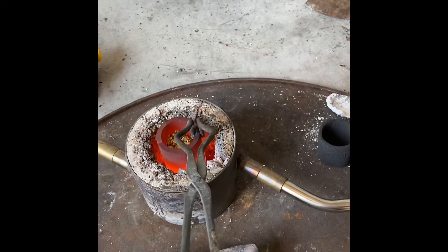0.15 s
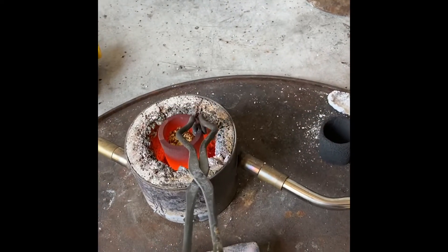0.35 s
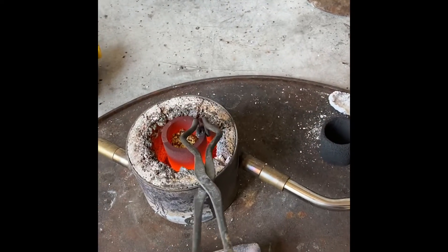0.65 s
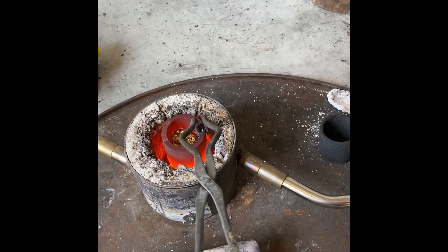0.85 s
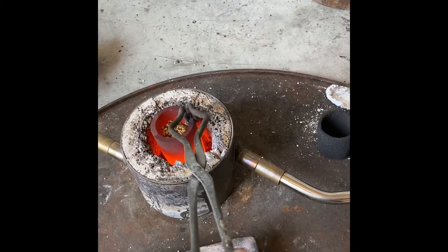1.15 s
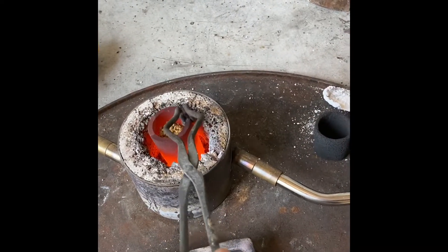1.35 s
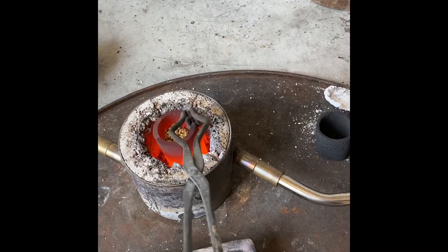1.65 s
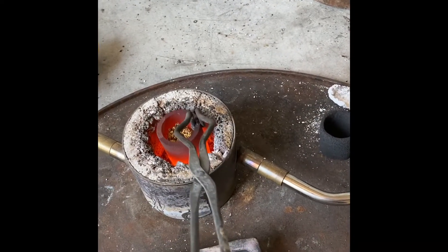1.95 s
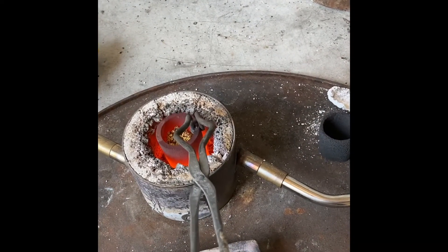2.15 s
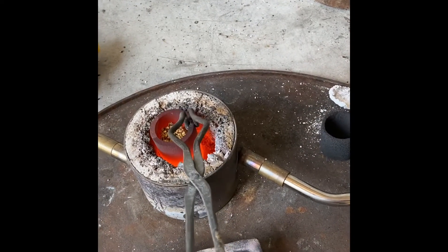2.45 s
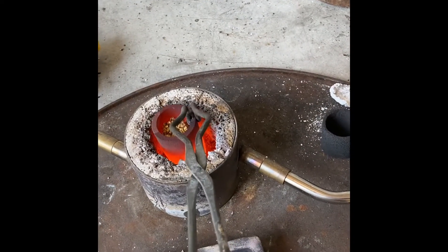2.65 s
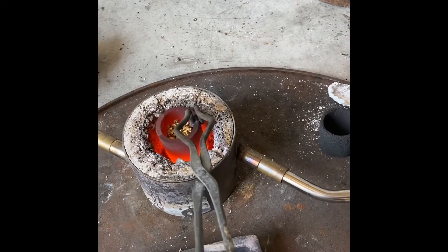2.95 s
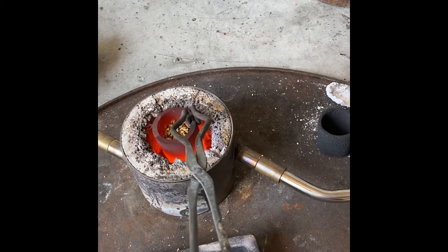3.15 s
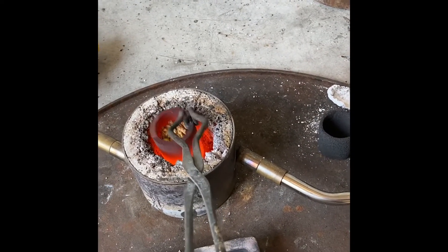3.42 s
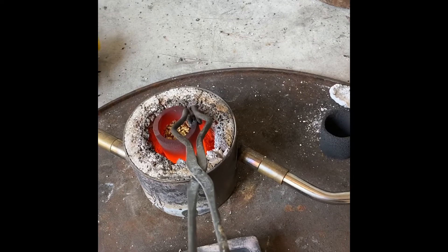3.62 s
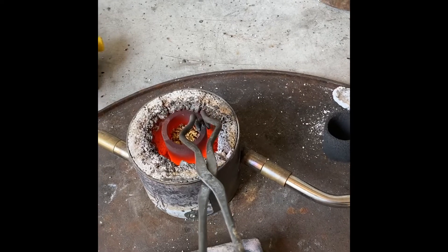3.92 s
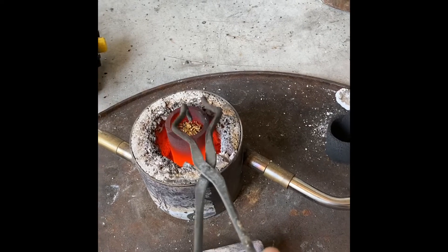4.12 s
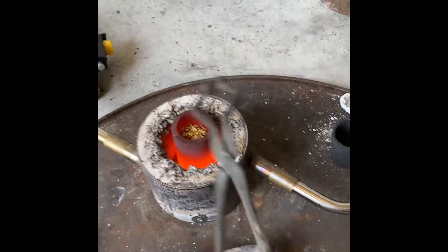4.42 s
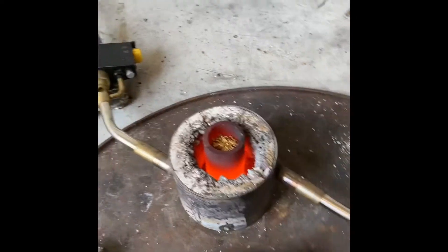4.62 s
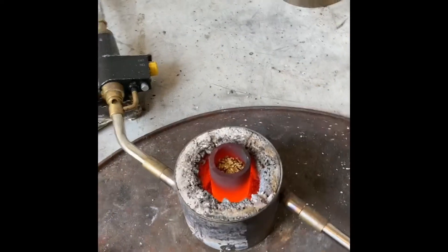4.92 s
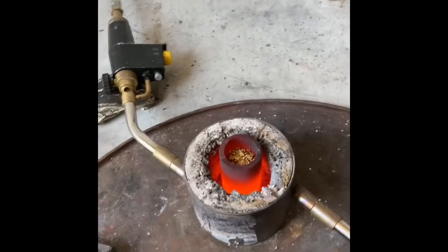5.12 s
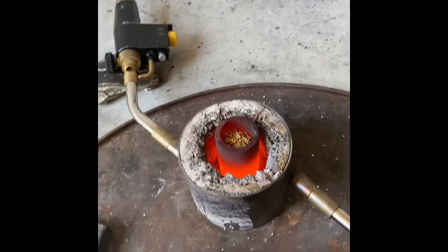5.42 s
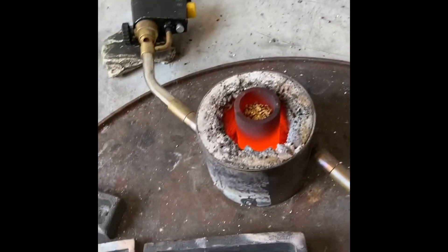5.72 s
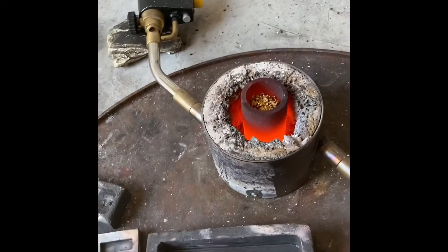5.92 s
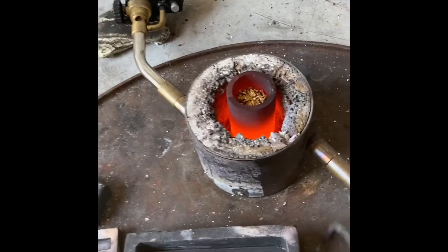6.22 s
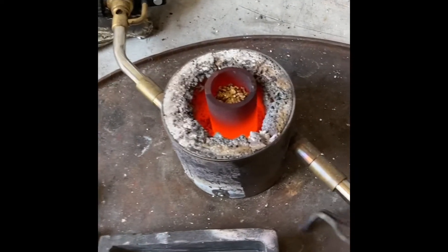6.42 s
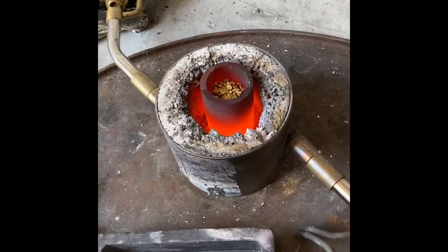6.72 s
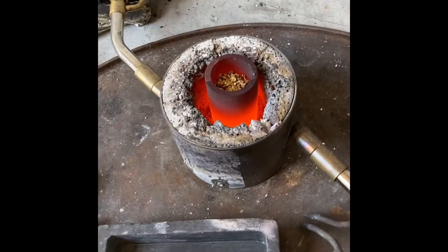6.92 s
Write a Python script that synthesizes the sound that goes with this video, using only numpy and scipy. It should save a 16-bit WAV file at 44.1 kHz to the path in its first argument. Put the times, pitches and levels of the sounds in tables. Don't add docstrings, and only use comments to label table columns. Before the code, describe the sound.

Quiet clay knocks and dry hinge ticks beside a low gas flame, distant engines passing, then tongs clank, bounce and settle on steel plate.

```python
import sys
import numpy as np
from scipy import signal
from scipy.fft import rfft, irfft, next_fast_len
from scipy.io import wavfile
from scipy.ndimage import uniform_filter1d

SR = 44100
rng = np.random.default_rng(int(sys.argv[2]) if len(sys.argv) > 2 else 0)


def to_wav(sig):
    pcm = np.clip(np.atleast_2d(sig), -1, 1) * 32767
    pcm = np.round(pcm).astype(np.int16)
    wavfile.write(sys.argv[1], SR, pcm.T)


def nominal_scale(level):
    x = np.asarray(level, float) / 20
    return 10 ** x


N = 311787

# start_s, level_db
DRAGS = [
    [(0.565, -54), (0.64, -54), (0.74, -62.5), (0.8, -69), (0.9, -68)],
    [(5.383, -47), (5.403, -35), (5.441, -54.5), (5.58, -45.5), (5.685, -45.5), (5.78, -58), (5.885, -60.5)],
    [(6.06, -61), (6.095, -41), (6.17, -48), (6.24, -63), (6.36, -55.5), (6.47, -48), (6.561, -32),
     (6.76, -52), (7.07, -63.5)],
]
# pitch_hz, width_hz, level_db
BENDING_MODES = [(114, 17.2, 4), (212, 76, -2.5), (303.7, 15.7, 0.5), (400, 67, -3.5)]


def rms_one(x):
    return x / np.sqrt(np.mean(x ** 2) + 1e-20)


def in_time(rows):
    s, *columns = np.transpose(rows)
    t = np.arange(N) / SR
    gate = np.clip(np.minimum(t - s[0], s[-1] + .03 - t) / .012, 0, 1)
    return [np.interp(t, s, c) for c in columns] + [gate]


def at_hz(points, hz):
    return np.interp(np.log(hz), np.log(np.array(points)[:, 0]), np.array(points)[:, 1])


def band(x, low_hz, high_hz):
    edges = [low_hz, min(high_hz, .45 * SR)]
    return signal.sosfilt(signal.butter(2, edges, "band", fs=SR, output="sos"), x)


def drift(rate_hz):
    r = np.exp(-80 * np.pi * rate_hz / SR)
    slow = signal.lfilter([1], [1, -2 * r, r * r], rng.standard_normal(N // 40 + 2002))[2000:]
    return np.interp(np.arange(N) / 40, np.arange(len(slow)), rms_one(slow))


def resonate(x, hz, width_hz):
    r = np.exp(-np.pi * width_hz / SR)
    gain = (1 - r * r) / 2
    return signal.lfilter([gain, 0, -gain], [1, -2 * r * np.cos(2 * np.pi * hz / SR), r * r], x + 1e-18)


def grit(per_s, uneven_db):
    sizes = nominal_scale(uneven_db * np.minimum(rng.exponential(1, N), 4)) * rng.choice([-1, 1], N)
    return rms_one(sizes * (rng.random(N) < per_s / SR))


def first_contact(grains, s, size):
    out = grains.copy()
    out[np.round(s * SR).astype(int)] = size
    return out


def strokes(s, db, t60, rise):
    out, t = np.zeros(N + SR), np.arange(-(SR // 40), SR // 3) / SR
    for s0, level, decay, up in zip(s, nominal_scale(db), np.maximum(t60, .004), np.maximum(rise, 5e-5)):
        swell_db = 20 * t / up - 30 * (40 * t) ** 4
        decay_db = -60 * np.abs(t / decay) ** 1.114
        out[round(s0 * SR) - SR // 40:][:len(t)] += level * nominal_scale(np.where(t < 0, swell_db, decay_db))
    return out[:N]


def body(force, s, modes, grains, spread_db, broad_db, low_hz, high_hz):
    touch = np.searchsorted(np.array(s) * SR, np.arange(N)) - 1
    spot = nominal_scale(min(spread_db, 5) * rng.uniform(-1, 1, (len(s), len(modes))))
    chosen = [(k, m) for k, m in enumerate(modes) if low_hz <= m[0] < high_hz]
    push = force * grains
    rings = sum((-1) ** k * nominal_scale(db) * resonate(push * spot[touch, k], hz, w) for k, (hz, w, db) in chosen)
    ring_rms = np.std(sum(nominal_scale(db) * resonate(grains[:SR], hz, w) for k, (hz, w, db) in chosen))
    crunch = band(push, low_hz, high_hz) / np.std(band(grains[:SR], low_hz, high_hz))
    return rings / ring_rms + nominal_scale(broad_db) * crunch


def grip_tones(force, s, grip_hz, cycles):
    out = np.zeros(N + SR)
    at = np.round(np.append(s, s[-1] + 0.03) * SR).astype(int) - 200
    for i, j, hz in zip(at, at[1:], grip_hz):
        push = np.zeros(SR // 4)
        push[:min(j - i, len(push))] = force[i:j][:len(push)]
        out[i:i + len(push)] += resonate(push, hz, hz / cycles) * np.sqrt(cycles * SR / hz)
    return out[:N]


def ports(x, pan_db=0):
    turns = np.minimum(np.arange(N // 2 + 1) * SR / N * .00011, 1.2)
    late = irfft(rfft(x) * np.exp(-2j * np.pi * turns), N)
    return np.array([late * nominal_scale(pan_db / 2), x * nominal_scale(-pan_db / 2)])


def plate():
    # start_s, knock_db, clink_db, boom_db, ring_hz
    set_down = [(5.399, -42, -19.5, -52, 2780), (5.406, -37, -10, -21.5, 6150),
                (5.408, -11, -34, -28, 1590), (5.452, -20.5, -29, -39, 1720), (5.456, -50, -32, -54, 3870),
                (5.496, -46, -41, -28, 1850), (5.584, -62, -34, -28, 9100),
                (5.604, -19.5, -28.5, -19.5, 1050), (5.638, -22, -27.5, -20.5, 850),
                (5.645, -62, -35, -60, 8200), (5.677, -23.5, -37, -27, 2000),
                (5.737, -26, -28.5, -27, 1870), (5.784, -24.5, -48, -37, 1665),
                (5.813, -26.5, -35.5, -31.5, 3470), (5.857, -32, -41.5, -42, 8650),
                (5.953, -41, -52, -48, 1500), (6.074, -28.5, -39, -31, 1440),
                (6.101, -36.5, -42.5, -51, 1430), (6.147, -35, -42, -42, 7200),
                (6.214, -40, -56, -28, 1130), (6.357, -42, -49.5, -55, 935)]
    # start_s, knock_db, clink_db, boom_db, ring_hz
    let_go = [(6.495, -50, -26, -50, 6280), (6.502, -30, -11, -18, 6420), (6.51, -15, -60, -39, 630),
              (6.525, -10.5, -14.5, -21.5, 928), (6.528, -50, -26, -50, 8300),
              (6.553, -13, -8, -24.5, 9300), (6.556, -19, -46, -42, 1820), (6.584, -18.5, -9, -19.5, 3870),
              (6.609, -31.5, -24.5, -48.5, 930), (6.651, -15.5, -15, -45, 7200),
              (6.657, -43, -43, -48, 665), (6.664, -29.5, -47, -46.5, 1850), (6.718, -30.5, -22, -33, 7000),
              (6.737, -37, -35.5, -47.5, 1450), (6.916, -33.5, -80, -23, 400),
              (6.949, -35.5, -43.5, -48, 1880), (6.976, -22.5, -19, -47, 1590), (7, -13.5, -27, -21, 1246),
              (7.031, -42, -71, -45, 536)]
    # pitch_hz, width_hz, level_db
    plate_modes = [(600, 40, -6.5), (940, 27, -5.5), (1457, 26, -7.5), (1712, 43, -6), (1831, 37, -9),
                   (2758, 51, 2), (3200, 17, -18), (3716, 66, 5.5), (3870, 190, 4), (4500, 230, 5.5),
                   (6420, 80, -1), (7200, 110, -5), (8560, 22, -15), (9270, 220, -7)]
    # pitch_hz, width_hz, level_db
    slide_modes = [(1450, 30, 8), (1840, 35, 10), (2490, 80, 3), (3530, 90, 6), (4060, 120, 5),
                   (4680, 80, 7), (7200, 400, -4)]
    s, knock_db, clink_db, boom_db, grip_hz = np.transpose(set_down + let_go)
    jaw_from_hz = 2450
    jaw = grip_hz > jaw_from_hz
    t60 = 0.043 + 0.07 * np.clip(-46.5 - boom_db, 0, 25) * ~jaw
    rise = 0.04 * t60

    drag_db, gate = in_time(DRAGS[1] + DRAGS[2])
    slide_force = nominal_scale(drag_db + 5.2 * drift(21.0)) * gate
    slide = body(slide_force, s, slide_modes, grit(2500, 3.4), 5.7, -8, 490, 8100)

    sharp = first_contact(grit(12000, 1.0), s, 1.76)
    clink_force = strokes(s, clink_db + 0.12, t60, rise)
    clink = body(clink_force, s, plate_modes, sharp, 5.5, -3, jaw_from_hz, 12700)
    jaw_force = strokes(s[jaw], clink_db[jaw] - 11.0, t60[jaw], rise[jaw])
    clink = clink + grip_tones(jaw_force * sharp, s[jaw], grip_hz[jaw], 52.5)

    dull = grit(7000, 0.68)
    knock_force = strokes(s, knock_db - 11.0, 1.14 * t60, 1.9 * rise)
    knock = body(knock_force, s, plate_modes, dull, 6.7, -5.0, 320, jaw_from_hz)
    flat_force = strokes(s[~jaw], knock_db[~jaw] - 13.0, t60[~jaw], rise[~jaw])
    knock = knock + grip_tones(flat_force * dull, s[~jaw], grip_hz[~jaw], 10.6)

    boom_force = strokes(s + 0.0049, boom_db - 4.5, 2.16 * t60, 4.9 * rise)
    boom = body(boom_force, s, BENDING_MODES, grit(9000, 2.74), 13.5, -5.0, 115, 580)
    floor_echo = nominal_scale(-9) * np.roll(band(clink + slide, 3470, 6000), round(0.002071 * SR))
    return floor_echo + ports(clink + slide, 0.54) + ports(knock, -7.0) + ports(boom, 0.27)


def furnace():
    # start_s, clay_db, steel_db, ring_hz
    knocks = [(0.125, -44.5, -65, 8500), (0.569, -43.5, -61, 3820), (1.367, -43.5, -70, 4030),
              (1.65, -30.5, -50, 3770), (1.878, -51, -61, 7898), (2.09, -49.5, -62.5, 12600),
              (2.151, -48, -93, 3040), (2.247, -31.5, -48.5, 3900), (2.318, -32, -54, 8600),
              (2.701, -37.5, -62, 3700), (2.806, -36, -55, 8600), (2.814, -24, -49.5, 8150),
              (2.849, -31.5, -40, 4300), (3.355, -25, -48, 8550), (3.368, -37, -67, 3900),
              (3.658, -59, -56.5, 8300), (3.844, -53, -72, 3370)]
    # start_s, clay_db, steel_db, ring_hz
    ticks = [(0.779, -87, -45.5, 3050), (0.97, -82, -43, 7640), (1.168, -58, -29, 8800),
             (1.183, -70, -50, 8500), (1.578, -55, -56, 9650), (2.388, -73, -43.5, 3535),
             (3.298, -66, -40, 3540), (3.97, -35, -30.5, 9700), (4.185, -42, -38, 9600),
             (4.26, -80, -49.5, 9500), (4.408, -67, -29, 9900), (4.567, -82, -54, 6300),
             (4.698, -83, -56, 13500), (4.762, -80, -70, 14300), (4.856, -50, -59, 3200),
             (4.944, -57, -62, 7000), (5.074, -83, -66, 13900), (5.09, -80, -54, 9500),
             (5.199, -72, -56, 8850), (6.009, -60, -49, 9500), (6.022, -65, -40, 9600),
             (6.062, -34, -54.5, 7400), (6.086, -23, -19.5, 9360), (6.149, -52, -27.5, 9900),
             (6.217, -28, -60, 8500), (6.586, -23, -16, 6400)]
    # start_s, clay_db, steel_db
    rubs = [(0.155, -53, -70.5), (0.238, -51.5, -74.5), (0.332, -48.5, -73), (0.41, -43, -73),
            (1.218, -47.5, -70.5), (1.282, -51.5, -75), (1.328, -48.5, -70), (1.426, -48.5, -77),
            (1.692, -45.5, -50.5), (1.938, -45, -71), (2.829, -43, -49), (2.92, -60, -72),
            (3.783, -50.5, -69.5), (4.015, -76, -53.5)]
    # pitch_hz, width_hz, level_db
    clay_modes = [(620, 90, -8), (1050, 200, -3), (1550, 200, 0), (2200, 250, -7), (4250, 400, -9)]
    # pitch_hz, width_hz, level_db
    hinge_modes = [(3700, 220, -6), (4500, 120, -4), (8600, 60, -18), (11000, 110, -26)]
    # pitch_hz, width_hz, level_db
    scrape_modes = [(840, 40, -8), (1010, 15, 3), (1300, 30, -3), (1670, 35, -4), (1890, 25, -1),
                    (2300, 50, -10), (2690, 16, 2), (3050, 16, 2), (3450, 40, -5), (3820, 22, 3),
                    (4800, 30, -14), (5760, 70, -4), (6360, 80, -18), (6820, 80, -18)]
    rubs = [(*row, 8500) for row in rubs]
    kinds = [(knocks, 0.046, 0.007), (ticks, 0.011, 0.0014), (rubs, 0.1, 0.076)]
    touches = sorted((*row, t60, rise) for rows, t60, rise in kinds for row in rows)
    s, knock_db, tick_db, grip_hz, t60, rise = np.transpose(touches)

    dull = first_contact(grit(7000, 5.5), s, np.minimum(0.028 / rise, 5))
    knock_force = strokes(s, knock_db - 8.0, t60, rise)
    knock = body(knock_force, s, clay_modes, dull, 7.8, -15.0, 350, 5300)

    sharp = first_contact(grit(13000, 6.4), s, np.minimum(0.0083 / rise, 7))
    push = strokes(s, tick_db + 1.5, 1.19 * t60, 0.079 * rise)
    tick = body(push, s, hinge_modes, sharp, 0.9, 0.12, 2000, 15000)
    tick = tick + nominal_scale(-4.5) * grip_tones(push * sharp, s, grip_hz, 7.2)

    drag_db, gate = in_time(DRAGS[0])
    scrape_force = nominal_scale(drag_db + 1.1 * drift(41)) * gate
    scrape = body(scrape_force, s, scrape_modes, grit(4900, 4.5), 0, -5, 440, 6700)

    touch = np.searchsorted(s * SR - 200, np.arange(N)) - 1
    steely = np.clip((tick_db - knock_db + 15.0) / 22, 0, 1)[touch]
    tick = tick * (1 - 0.85 * steely) + 0.38 * band(tick * steely, 10600, 20300)
    return ports(knock + scrape, -4.5) + ports(tick, -0.33)


def hinge_slaps():
    # start_s, ring_db, crack_db
    slaps = [
        (1.168, -54, -17),
        (3.969, -51, -31),
        (4.185, -58, -28),
        (4.405, -27.5, -45),
        (5.407, -32, 1),
        (6.087, -49, -25),
        (6.557, -23, 6),
        (6.583, -36, -11),
    ]
    # pitch_hz, level_db, t60_s
    jaw_modes = [(8285, -13, 0.05), (9674, -12, 0.045), (10150, -8, 0.03), (10360, -16, 0.05),
                 (13240, -16, 0.033), (13410, -15, 0.055), (14580, 0, 0.011), (15180, -21, 0.05),
                 (15620, -3, 0.025)]
    s, ring_db, crack_db = np.transpose(slaps)
    at, out = np.round(s * SR).astype(int), np.zeros(N)
    out[at] = nominal_scale(crack_db + 2.0)
    out = band(out, 3200, 8900)
    for hz, db, t60 in jaw_modes:
        clicks = np.zeros(N)
        clicks[at] = nominal_scale(ring_db + db + 2 * rng.standard_normal(len(s)))
        r, w = nominal_scale(-60 / (t60 * SR)), 2 * np.pi * hz / SR
        out += signal.lfilter([0, np.sin(w)], [1, -2 * r * np.cos(w), r * r], clicks + 1e-18)
    return ports(out)


def partials():
    # start_s, level_db, pitch_hz, t60_s
    free_modes = [(0.24, -52, 1516, 0.11), (0.33, -50.5, 1060, 0.096), (0.329, -53, 1500, 0.1),
                  (0.402, -54, 1055, 0.14), (0.407, -49, 1540, 0.12), (0.41, -65, 3520, 0.13),
                  (2.845, -36, 4370, 0.038), (2.846, -38, 3820, 0.039), (2.846, -40, 4850, 0.038),
                  (2.847, -52, 4540, 0.13), (2.847, -58, 4200, 0.3), (2.848, -36.5, 8400, 0.058),
                  (2.848, -45, 7800, 0.06), (2.848, -42, 2570, 0.062), (4.853, -57, 3250, 0.05),
                  (4.853, -64, 2710, 0.04), (5.403, -19, 7600, 0.053), (5.405, -21, 8253, 0.04),
                  (5.406, -25, 8470, 0.09), (5.407, -16, 9250, 0.044), (5.449, -36, 8560, 0.076),
                  (5.412, -14, 1640, 0.042), (5.452, -25, 1706, 0.08), (5.637, -38, 4600, 0.09),
                  (5.64, -34, 299.4, 0.24), (5.742, -29, 296.6, 0.4), (5.813, -22, 3480, 0.068),
                  (6.216, -41, 1116, 0.05), (6.218, -33, 450, 0.08), (6.595, -23, 291, 0.15),
                  (5.86, -58, 8000, 0.06), (6.524, -28, 8360, 0.06), (6.527, -24, 6800, 0.05),
                  (6.554, -23, 8559, 0.098), (6.554, -30, 7316, 0.08), (6.554, -30, 3780, 0.06),
                  (6.585, -36, 8285, 0.057), (6.65, -32, 8300, 0.11), (6.668, -25, 3830, 0.05),
                  (6.717, -30, 7250, 0.043), (6.737, -34, 7070, 0.04), (6.512, -25, 152, 0.14),
                  (6.918, -34.5, 724, 0.055), (7.003, -28, 774, 0.057), (7.004, -23, 1233, 0.06),
                  (7.03, -31, 70, 0.18)]
    out, t = np.zeros((2, N + SR)), np.arange(SR // 4) / SR
    rise = np.minimum(t / 0.00083, 1)
    for s, db, hz, t60 in free_modes:
        on_plate = int(s > 5.3)
        tone = nominal_scale(db - 60 * t / t60) * rise * np.sin(2 * np.pi * hz * t)
        out[on_plate, round(s * SR):][:len(t)] += tone
    return out[0, :N] + ports(out[1, :N])


def thuds():
    # start_s, level_db, pitch_hz, t60_s, rattle_db
    jolts = [(0.027, -30.5, 90, 0.086, -67), (0.111, -60, 370.7, 1, -78), (0.161, -31.5, 69.2, 0.16, -81),
             (0.405, -18.5, 85.5, 0.05, -62), (1.349, -29, 105.3, 0.56, -48),
             (1.912, -27.5, 104.8, 0.093, -50), (2.821, -20, 111.7, 0.19, -27.5),
             (2.848, -12, 133, 0.052, -38), (2.886, -38, 188, 0.65, -47), (3.363, -16, 112.2, 0.093, -26.5),
             (3.421, -20, 114, 0.071, -38), (3.794, -33.5, 91, 0.14, -46), (3.841, -33.5, 75, 0.1, -70),
             (6.225, -27.5, 110.6, 0.14, -65), (6.919, -26, 123, 0.37, -31.5)]
    s, db, hz, t60, rattle_db = np.transpose(jolts)
    swing, t = np.zeros(N + SR), np.arange(SR // 2) / SR
    rise = np.minimum(t / 0.0052, 1)
    for s0, level, pitch, decay in zip(s, nominal_scale(db), hz, t60):
        tone = nominal_scale(-60 * t / decay) * rise * np.sin(2 * np.pi * pitch * t)
        swing[round(s0 * SR):][:len(t)] += level * tone
    force = strokes(s + 0.0084, rattle_db - 6.0, t60, 0.012 + 0 * s)
    rattle = body(force, s, BENDING_MODES, grit(9000, 0.46), 9.9, 1.0, 204, 472)
    return swing[:N] + ports(rattle, .6)


def rustles():
    # start_s, level_db
    rocking = [
        (2.85, -53),
        (2.9, -61),
        (3.0, -69),
        (3.12, -80.5),
    ]
    # start_s, level_db
    sleeve = [
        (4.45, -80),
        (4.65, -77.5),
        (4.86, -67.5),
        (5.0, -70.5),
        (5.15, -95),
    ]
    # pitch_hz, width_hz, level_db
    grit_modes = [(1050, 60, 5), (1650, 90, 0), (3700, 95, -18), (4300, 52, -1), (4900, 120, -9),
                  (5590, 60, -3)]
    rock_db, rock_gate = in_time(rocking)
    cloth_db, cloth_gate = in_time(sleeve)
    grains = grit(5000, 3.0)
    rock_force = nominal_scale(rock_db + 2.0 * drift(30)) * rock_gate
    rock = body(rock_force, [0.0], grit_modes, grains, 0, -10.0, 801, 6000)
    cloth = rms_one(band(band(grains, 440, 4000), 440, 4400))
    return rock + nominal_scale(cloth_db + 3.0 * drift(25)) * cloth_gate * cloth


def workshop(x):
    t60_s, wall_cut_hz = 0.24, 7000
    size = next_fast_len(N + SR)
    hz = np.arange(size // 2 + 1) * SR / size
    lags = rng.uniform(.011, .04, (2, 6, 1))
    loss = nominal_scale(-60 * lags / t60_s * (0.5 + hz / wall_cut_hz))
    loop = loss * np.exp(-2j * np.pi * hz * lags)
    return irfft(rfft(x, size) * np.sum(loop / (1 - loop), axis=1), size)[:, :N]


def engine(rows, first, flutter_db, throb_db, middle_db):
    hz, level_db, loss_db, gate = in_time(rows)
    phase = 2 * np.pi * np.cumsum(hz * (1 + 0.0029 * drift(2.45))) / SR
    throb = throb_db * np.cos(2 * np.pi * (np.arange(N) / SR - 0.921) / 0.3684)
    out = 0
    for k in range(3):
        db = level_db - k * loss_db + middle_db * (k == 1) + throb * (-1) ** k + flutter_db * drift(12.3)
        out = out + nominal_scale(db) * np.sin((first + k) * phase)
    return gate * np.sqrt(2) * out


def engines():
    # start_s, firing_hz, level_db, loss_db per higher multiple
    first_car = [
        (0.62, 92, -50.5, 21),
        (0.91, 97.9, -48, 27),
        (1.23, 103.5, -42, 41),
        (1.63, 108.9, -41.5, 12.5),
        (2.08, 117.5, -36.5, 8),
        (2.5, 121.7, -36, 14.5),
        (2.71, 105, -45, 18),
        (3.1, 101, -41, 19),
        (3.35, 95.3, -58, 21),
    ]
    # start_s, shaft_hz, level_db, loss_db per higher multiple
    second_car = [
        (3.75, 33.37, -57, 2),
        (4.29, 42.07, -47, 11.5),
        (4.45, 42.6, -60, 2),
        (5.05, 41.2, -61, -1),
        (5.48, 42.62, -53, 1.5),
        (6.1, 38.87, -61, -4),
    ]
    one = engine(first_car, 0.98, flutter_db=2.5, throb_db=3.5, middle_db=-2.0)
    two = engine(second_car, 2, flutter_db=3.5, throb_db=0.9, middle_db=8.0)
    return (one + two) * nominal_scale([[-1.2], [1.2]])


def whine():
    # start_s, centre_hz, level_db
    tyres = [(4.3, 4530, -90), (4.33, 4500, -77), (4.42, 4550, -79), (4.57, 4200, -86), (4.64, 4300, -70.5),
             (4.74, 4620, -69), (4.86, 4350, -78.5), (5.07, 4440, -86), (5.12, 4440, -100)]
    width_hz = 350
    hz, level_db, gate = in_time(tyres)
    a, b = [rms_one(band(row, 10, width_hz / 2)) for row in rng.standard_normal((2, N))]
    phase = 2 * np.pi * np.cumsum(hz) / SR
    return gate * nominal_scale(level_db + 1.5 + 2.0 * drift(27.0)) * (a * np.cos(phase) + b * np.sin(phase))


def banded_noise(spectrum, patchy_db):
    # pitch_hz, likeness (-1 to 1)
    likeness = [(60, 1), (130, 1), (290, 0.94), (640, -0.54), (1410, -0.47), (3100, -0.89), (6820, 0.17),
                (15000, -0.55)]
    out, together, white = 0, drift(0.5), rng.standard_normal((2, 2, N))
    edges = np.geomspace(spectrum[0][0], spectrum[-1][0], 10)
    for k, (low, high) in enumerate(zip(edges, edges[1:])):
        mid, side = band(white[k % 2], low, high)
        hz = np.sqrt(low * high)
        alike = np.clip(at_hz(likeness, hz), -1, 1)
        gain = nominal_scale(at_hz(spectrum, hz) + patchy_db * (1.17 * together + drift(8.3)))
        out = out + gain * (np.sqrt(1 + alike) * mid + np.sqrt(1 - alike) * side * [[1], [-1]])
    return rms_one(out)


def background(near):
    # start_s, peak_db, fade_s
    puffs = [(0.0, -50, 0.44), (0.44, -47, 0.35), (1.1, -48, 0.82), (1.6, -47.5, 0.35), (2.0, -62, 0.16),
             (2.85, -63, 0.086), (4.1, -73, 0.24), (5.568, -42.5, 0.089), (5.87, -54, 0.18),
             (6.26, -41.5, 0.18)]
    # start_s, rumble_db
    flame = [(0.0, -51.5), (0.55, -58.5), (1.1, -58.5), (2.01, -43), (2.85, -45.5), (3.09, -49),
             (3.5, -42.5), (4.17, -48), (5.36, -51.5), (5.6, -51.5), (6.06, -43), (6.7, -40.5), (7.07, -57)]
    # pitch_hz, level_db per Hz
    rumble_spectrum = [(35, -64.5), (60, -3.5), (108, -2), (140, -4.5), (294, -14), (568, -13), (711, -17),
                       (1000, -37.5), (1300, -58.5), (2200, -120)]
    # pitch_hz, level_db per Hz
    hiss_spectrum = [(470, -56), (800, -17.5), (1460, 5), (1740, -1.5), (2870, -10), (4570, -14.5),
                     (5510, -52.5), (8770, -19.5), (10600, -14), (11600, -58), (13800, -12), (14700, -28),
                     (16000, -41)]
    t = np.arange(N) / SR
    gusts = nominal_scale(-63)
    for s, db, fade in puffs:
        gusts = gusts + nominal_scale(db) * np.exp(np.minimum((t - s) / 0.18, (s - t) / fade))
    shared, left, right = [rms_one(band(rng.standard_normal(N), 46.3, 102.7)) * nominal_scale(2.1 * drift(22))
                           for _ in range(3)]
    air = gusts * (0.22 * shared + 1.17 * np.array([left, right]))

    rumble_db, _ = in_time(flame)
    r = nominal_scale(-2 * 60 / (0.65 * SR))
    linger = nominal_scale(-18.5) * np.sqrt(signal.lfilter([1 - r], [1, -r], band(near, 400, 6000) ** 2))
    hiss = nominal_scale(-63 + 0.056 * (rumble_db - rumble_db.mean())) + linger
    rumble = nominal_scale(rumble_db) * banded_noise(rumble_spectrum, patchy_db=3.5)
    return air + rumble + hiss * banded_noise(hiss_spectrum, patchy_db=3.5)


def scene():
    clatter = plate()
    near = furnace() + hinge_slaps() + thuds() + clatter
    room = workshop(near)
    echoes = nominal_scale(-16.0) * ports(room[0]) + nominal_scale(-21.0) * room
    return near + echoes + engines() + background(clatter[1]) + whine() + partials() + rustles()


def low_pass(x):
    return signal.sosfilt(signal.butter(12, 16990, fs=SR, output="sos"), x)


def record(dry):
    # channel (0 mid, 1 side), low_hz, high_hz, floor_db, jump_db
    dropped = [(0, 10690, 13270, -67, 5.5), (1, 7200, 10100, -85, -3.5), (1, 13700, 16430, -81, 3.5)]
    # low_hz, high_hz, rarity (spreads of chance)
    patchy = [(2400, 2600, 1.6), (2900, 3100, 1.2), (3150, 3400, 0.9), (4600, 4850, 1.4), (4850, 5200, 0.0),
              (5200, 5550, -0.4), (5550, 5900, 0.0), (5900, 6250, 0.5)]
    ceiling = 0.95
    echo = np.roll(band(dry[0], 183, 800), round(0.00079 * SR))
    heard = dry + 0.19 * echo * np.array([[1], [0]])
    left, right = np.tanh(heard / ceiling) * ceiling * nominal_scale(-2.0)
    pair = np.array([left + right, left - right]) / 2

    for which, low_hz, high_hz, floor_db, jump_db in dropped:
        sos = signal.butter(3, [low_hz, high_hz], "band", fs=SR, output="sos")
        part = signal.sosfiltfilt(sos, pair[round(which)])
        now_db, around_db = [10 * np.log10(uniform_filter1d(part ** 2, size=n) + 1e-14) for n in (512, 2048)]
        threshold_db = np.maximum(floor_db, around_db + jump_db)
        kept = np.clip((now_db - threshold_db + 3.9 * drift(3.8)) / 3.9, 0, 1)
        pair[round(which)] -= (1 - 1.4 * kept) * part

    top = band(pair[0], 5800, 10000) ** 2
    jump = uniform_filter1d(top, size=256) / (uniform_filter1d(top, size=2048) + 1e-14)
    calm = np.clip(2.5 - jump, 0, 1)
    for low_hz, high_hz, rarity in patchy:
        sos = signal.butter(5, [low_hz - 40, high_hz + 40], "band", fs=SR, output="sos")
        part = signal.sosfiltfilt(sos, pair[0])
        pair[0] -= calm * np.clip(12 * (drift(7) - rarity), 0, 1) * part

    stereo = np.array([pair[0] + pair[1], pair[0] - pair[1]])
    mix = signal.sosfilt(signal.cheby2(12, 75, 16800, fs=SR, output="sos"), stereo)
    return low_pass(mix)


dry = scene()
out = record(dry)
to_wav(out)
```